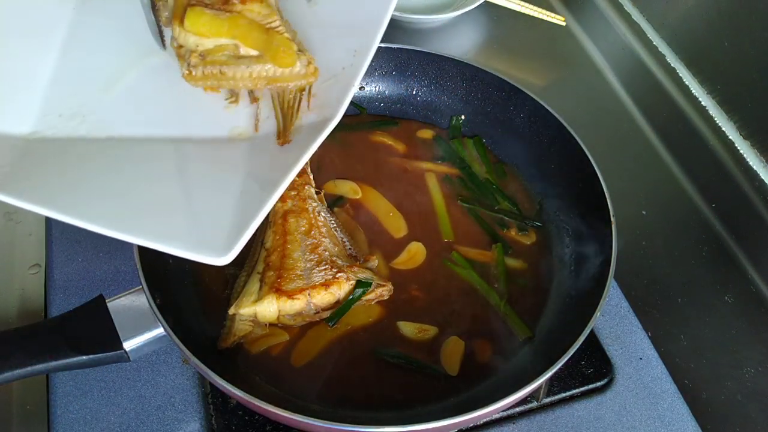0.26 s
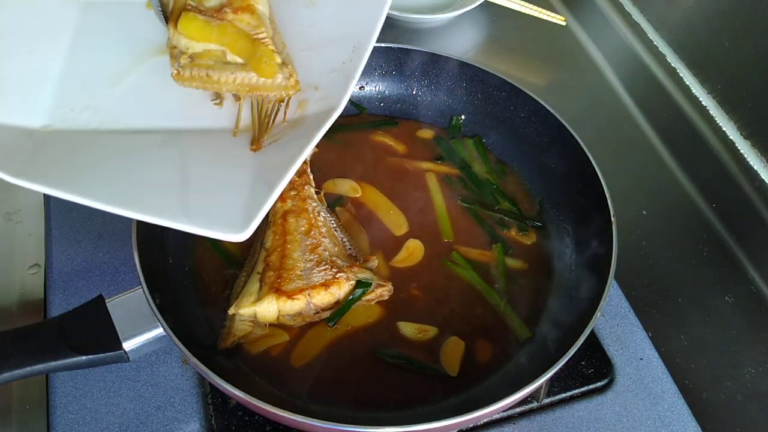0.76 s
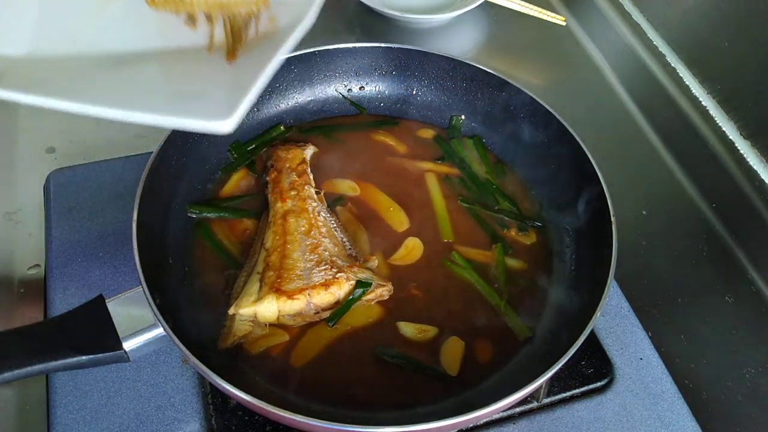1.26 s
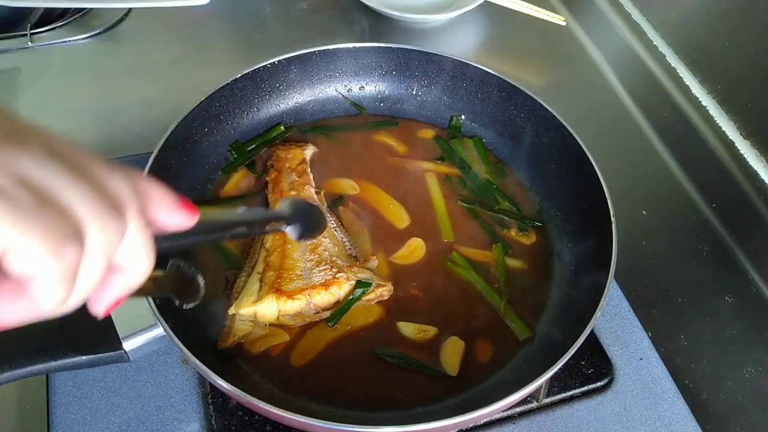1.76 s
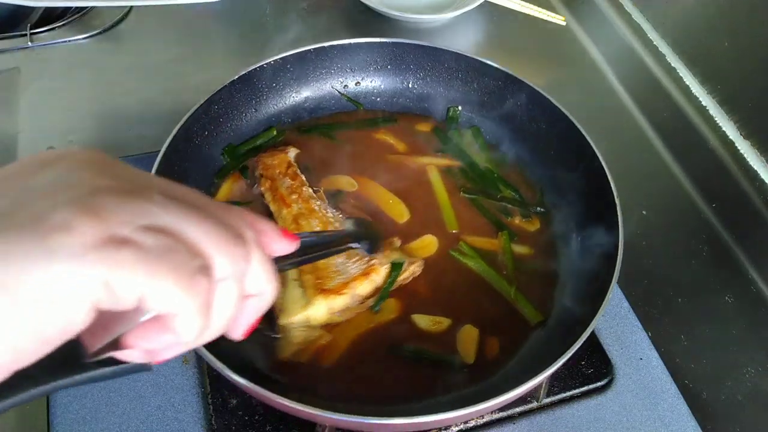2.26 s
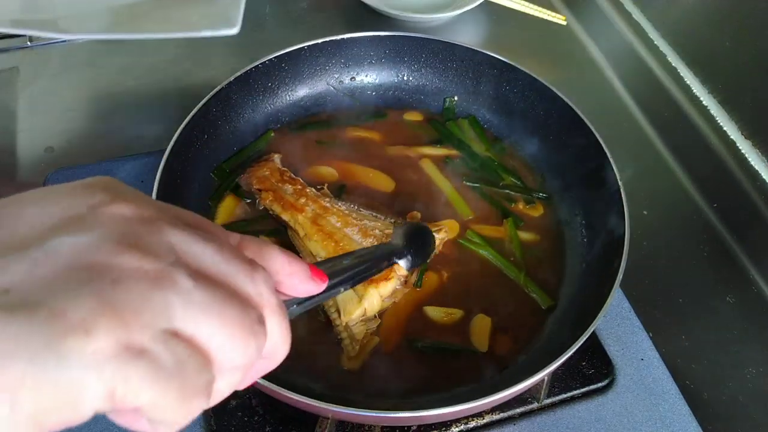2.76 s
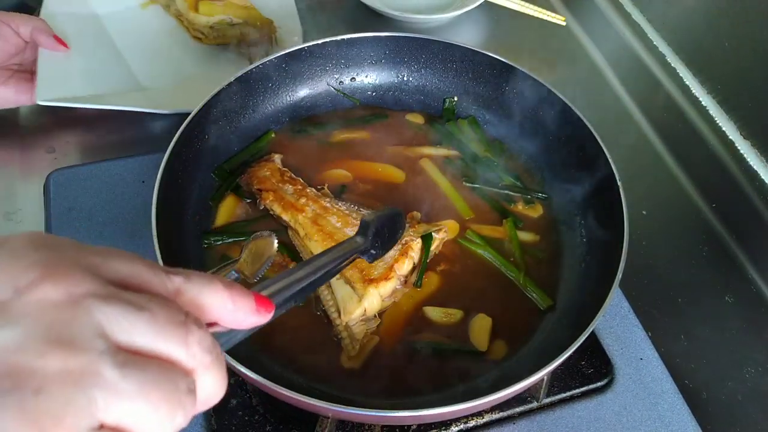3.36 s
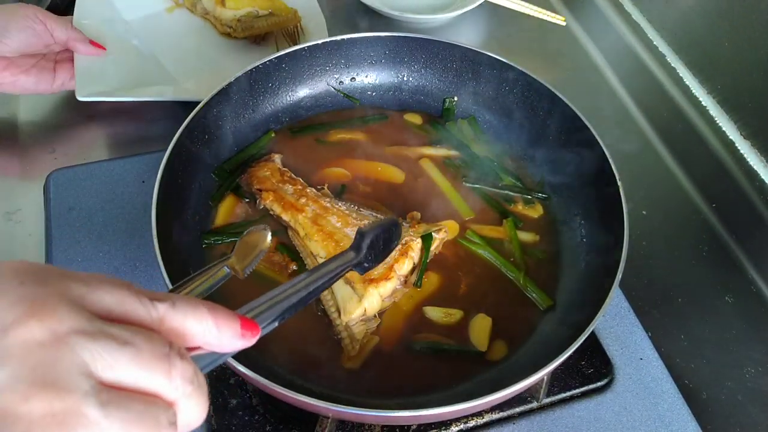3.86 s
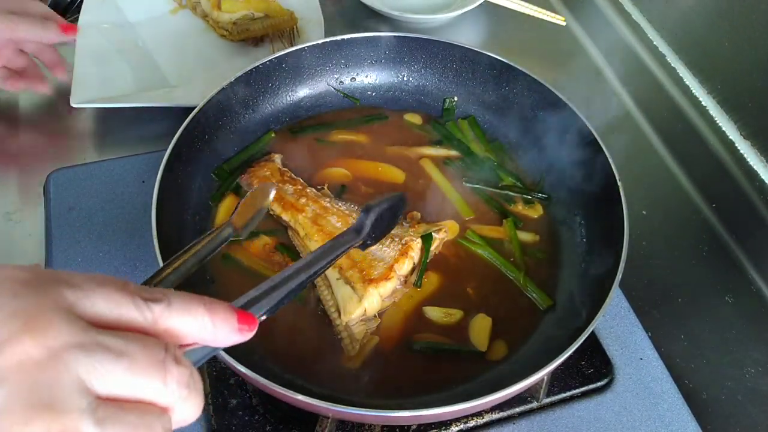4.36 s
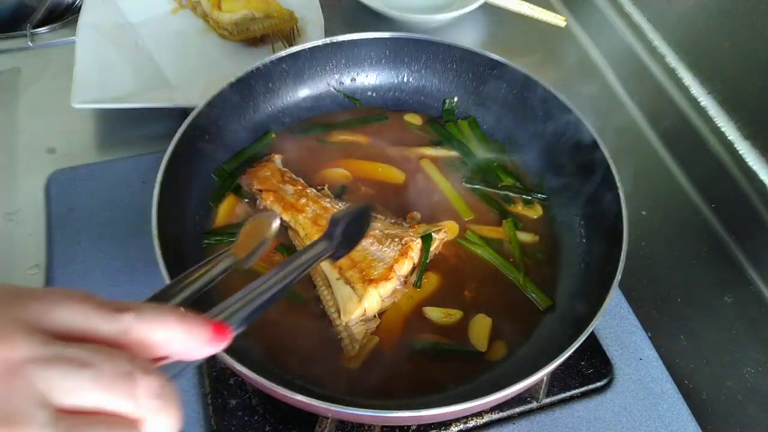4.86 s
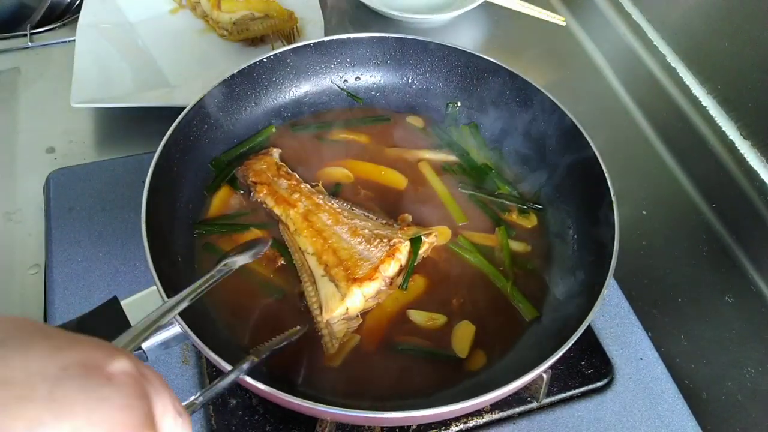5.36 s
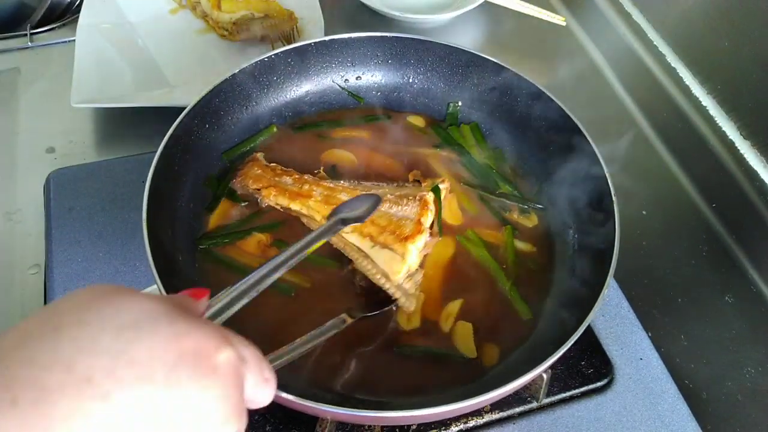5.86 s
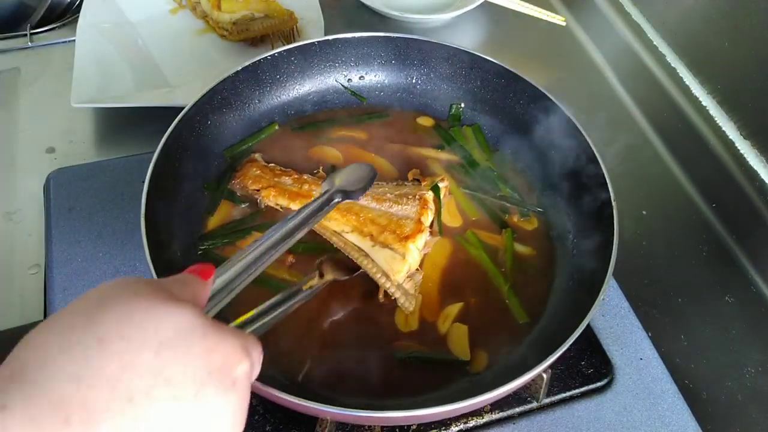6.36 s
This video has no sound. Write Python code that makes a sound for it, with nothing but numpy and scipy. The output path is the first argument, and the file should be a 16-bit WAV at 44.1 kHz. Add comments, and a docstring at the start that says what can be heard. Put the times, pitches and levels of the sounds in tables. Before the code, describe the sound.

Close to a stove, metal tongs give faint dry clicks, then a sharp clack on a pan, which settles with a soft falling tone. Scraping and a cluster of strong, dull metallic thuds come next, then a short lull, a run of quick light knocks, and final clicks and rubs. A deep motor hum continues throughout in a small reflective kitchen, picked up in close stereo.

```python
"""An extractor fan hums throughout in a small hard kitchen: a motor tone with overtones over rumble and rushing air.
From the start the steel tongs tick and tinkle, in short noise bursts around two pitches and ringing steel modes.
From 1.7 s they knock and clack on a coated frying pan: pan, stove grate and stove top ring under a steel crack.
Just after, the pan settles with a falling tone; then strokes of the tongs rub and scrape in slipping noise.
A pair of small microphones stands close by: bass nearly alike in both, treble unrelated."""
import sys
import numpy as np
from scipy import signal
from scipy.fft import rfft, irfft, next_fast_len
from scipy.io import wavfile
from scipy.ndimage import map_coordinates

SR = 44100
rng = np.random.default_rng(int(sys.argv[2]) if len(sys.argv) > 2 else 0)


def to_wav(s):
    """Save 16-bit WAV."""
    ch = np.atleast_2d(s).T  # columns
    pcm = np.round(np.clip(ch, -1, 1) * 32767)  # PCM
    wavfile.write(sys.argv[1], SR, pcm.astype(np.int16))


N = 291060

# Likeness of the two microphones: (frequency [Hz], likeness [-1 to 1])
LIKENESS = [(60, 0.99), (130, 1), (290, 0.68), (640, 0.29), (1400, -0.2), (3000, -0.025)]
# Modes of the steel tongs: (frequency [Hz], relative level [dB], 60 dB decay before damping [s])
TONGS_MODES = [(1820, -2, .05), (2330, -3, .06), (2770, -3, .05), (3350, -3, .05), (3830, -3, .06),
               (4080, -3, .08), (4600, -7, .04), (5260, -4, .07), (5570, -4, .09), (6280, -8, .05),
               (10300, -8, .04), (11200, 0, .06), (13300, -4, .05), (15000, -1, .06)]
# Spectrum of steel on metal: (frequency [Hz], relative level [dB per Hz])
STEEL_SPECTRUM = [(880, -13), (1500, -10.5), (1660, -6), (2080, -12), (2230, -12), (3690, -13.5),
                  (6000, -19), (7540, -20), (9370, -20), (11900, -13), (16000, -22)]


def amp(db):
    """Gain of a level in dB."""
    return 10 ** (np.asarray(db) / 20)


def unit(x):
    """x at rms 1."""
    return x / np.sqrt(np.mean(x ** 2) + 1e-20)


def along(points, hz):
    """(Hz, value) points read on a log frequency axis."""
    f, v = np.transpose(points)
    return np.interp(np.log(hz + 1), np.log(f + 1), v)


def wobble(rate):
    """A smooth random curve through rate knots a second."""
    knots = rng.standard_normal(int(N * rate / SR) + 4)
    return map_coordinates(knots, [np.arange(N) * rate / SR])


def filtered(x, response):
    """x times a response of frequency, padded so that the end does not wrap round."""
    m = next_fast_len(x.shape[-1] + 8192)
    return irfft(rfft(x, m) * response(np.fft.rfftfreq(m, 1 / SR)), m)[..., :x.shape[-1]]


def noise(n, spectrum):
    """Stereo noise of rms 1, alike in the bass and unrelated in the treble."""
    def mid_side_response(hz):
        turn = np.arccos(np.clip(along(LIKENESS, hz), -1, 1)) / 2
        return amp(along(spectrum, hz)) * [np.cos(turn), np.sin(turn)]

    mid, side = filtered(rng.standard_normal((2, n)), mid_side_response)
    return unit(np.array([mid + side, mid - side]))


def lumpy(spectrum, depth_db):
    """A spectrum broken up into many narrow peaks, as dense short modes of sheet metal give it."""
    hz = np.geomspace(100, 20000, num=150)
    return np.transpose([hz, along(spectrum, hz) + depth_db * rng.standard_normal(len(hz))])


def ring(modes, t, near_hz, focus_db, damping=1):
    """Decaying modes at new random strengths, focus_db weaker per octave away from near_hz."""
    hz, db, t60 = np.transpose(modes)[:, :, None]
    db = db - focus_db * np.abs(np.log2(hz / near_hz)) + rng.normal(0, 2, hz.shape)
    # the less alike the microphones are at a pitch, the more their phases may differ
    apart = np.arccos(np.clip(along(LIKENESS, hz), -1, 1)) * rng.uniform(-1, 1, hz.shape)
    fade = amp(db - db.max() - 60 * t / (t60 * damping))
    return np.array([(fade * np.sin(2 * np.pi * hz * t + side * apart / 2)).sum(0) for side in (1, -1)])


def swell(s, rise_s, fade_s):
    """Gain per sample: 1 at s, 20 dB down rise_s before and fade_s after."""
    t = np.arange(N) / SR - s
    return amp(-20 * np.maximum(-t / rise_s, t / fade_s) ** 1.22)


def add(out, s, x):
    """Mixes x into out from time s."""
    part = out[:, round(s * SR):][:, :x.shape[1]]
    part += x[:, :part.shape[1]]


def kitchen(x, wet_db):
    """x with the room's answer, a noise tail in which each frequency dies at its own speed."""
    # Reverberation of the room: (frequency [Hz], 60 dB decay [s])
    room_decay = [(100, 0.8), (500, 0.58), (2000, 0.76), (6000, 0.7), (14000, 0.37)]
    flat_noise = noise(SR * 3 // 5, [(1, 0)])
    hz, t, z = signal.stft(flat_noise, SR, nperseg=256)
    decay = amp(-60 * t / along(room_decay, hz)[:, None])
    tail = signal.istft(z * decay, SR, nperseg=256)[1]
    # the answer starts 200 samples (4.5 ms) after the direct sound
    tail = np.pad(tail / np.linalg.norm(tail[0]), ((0, 0), (200, 0)))
    wet = signal.fftconvolve(x.mean(0)[None], tail, axes=1)[:, :x.shape[1]]
    return x + amp(wet_db) * wet


def fan():
    """The motor's wavering tone, with overtones that come and go, over housing rumble and rushing air."""
    # Overtones of the hum: (multiple of the hum's pitch, mean peak level [dB])
    overtones = [(3, -64.5), (5, -68), (6, -76.5), (7, -73), (8, -69.5), (9, -75.5), (11, -77), (12, -75),
                 (13, -77), (14, -89), (15, -76), (20, -81.5), (45, -82)]
    # Wavering of the hum, a depth of 0 does nothing: (rate [Hz], depth [0-1])
    flutter = [(8.5, .03), (15, 0), (19.3, 0)]
    # The hum's octave swells and fades: (time [s], level [dB])
    octave_levels = [(0, -56.5), (.88, -58.5), (1.49, -70), (2.5, -57.5), (2.72, -47.5), (3.09, -61),
                     (3.75, -51.5), (4.7, -57), (5.42, -60), (5.62, -79), (5.99, -60), (6.6, -94)]
    # Rumble of the fan housing: (frequency [Hz], relative level [dB per Hz])
    rumble_spectrum = [(22, -37), (33, 2), (40, 1.5), (47, 2.5), (55, -18), (68, -10), (78, 4), (88, -31),
                       (110, -21), (140, -48)]
    # Rush of air: (frequency [Hz], relative level [dB per Hz])
    air_spectrum = [(56, -18), (95, -26), (118, -13.5), (239, -21.5), (284, -19.5), (330, -32), (465, -28),
                    (601, -27.5), (777, -30), (943, -34), (1190, -33), (3720, -47), (8050, -64.5),
                    (11800, -50), (16000, -64)]
    hum_hz, hum_db, rumble_db, air_db = 59.08, -31, -53.5, -57.5

    t = np.arange(N) / SR
    turn = 2 * np.pi * t
    waver = 1 + sum(depth * np.sin(turn * hz + 1.3 * wobble(1.6)) for hz, depth in flutter)
    tone = amp(hum_db + 0.13 * wobble(3.56)) * waver * np.sin(turn * hum_hz)
    tone += amp(np.interp(t, *np.transpose(octave_levels))) * np.sin(2 * turn * hum_hz)
    for k, db in overtones:
        tone += amp(db + 1.72 * wobble(1.95)) * np.sin(turn * hum_hz * k + k * k)
    rumble = amp(rumble_db) * noise(N, rumble_spectrum)
    air = amp(air_db + 0.4 * wobble(5.9)) * noise(N, air_spectrum)
    return tone + rumble + air


def ticks():
    """A tick is a few milliseconds of noise around two pitches; a tinkle rings the steel modes."""
    # Dry ticks of the tongs: (time [s], low level [dB], high level [dB], low pitch [Hz])
    tick_events = [(.0225, -53, -78, 4400), (0.066, -73, -54, 3160), (0.0735, -54, -78, 6600),
                   (.735, -59.5, -58, 4510), (0.7864, -58, -46.5, 3120), (0.794, -54.5, -63, 4420),
                   (1.1773, -63, -80, 3530), (1.614, -59, -60, 5960), (1.9684, -64, -56, 3360),
                   (2.1335, -69, -52, 3010), (2.466, -63, -80, 3380), (2.811, -60, -80, 3030),
                   (3.2529, -38, -65, 5230), (4.705, -66, -44, 3100), (5.3664, -74, -53, 3050),
                   (5.413, -58.5, -60, 3940), (6.1743, -41.5, -46, 2870), (6.1977, -45, -46, 3360),
                   (6.246, -56, -49, 3880), (6.3136, -58, -68, 3770), (6.395, -66, -57, 3090),
                   (6.576, -55, -56, 5000)]
    # Loose arms touching again and again:
    # (time [s], length [s], low level [dB], high level [dB], low pitch before scatter [Hz])
    tinkle_events = [(0.112, .215, -68, -60, 3420), (0.829, .01, -65, -66, 4080),
                     (0.968, .01, -70, -74, 4080)]
    high_tick_hz, high_scatter = 11000, 0.052  # scatter in natural log of pitch
    faint_db, faint_hz = -74, 3300
    tinkle_gap_s = 0.023

    out, t = np.zeros((2, N)), np.arange(SR // 8) / SR
    rise = 1 - np.exp(-t / 0.00048)
    # faint ticks fall by chance, about one a second
    faint = [(s, faint_db, faint_db, faint_hz) for s in rng.uniform(0, N / SR, size=N // SR)]
    for s, low_db, high_db, low_hz in tick_events + faint:
        high_hz = high_tick_hz * np.exp(high_scatter * rng.standard_normal())
        for db, hz in ((low_db, low_hz), (high_db, high_hz)):
            band = [(hz / 2, -30), (hz, 0), (hz * 2.57, -16), (hz * 4, -60)]
            add(out, s, amp(db - 60 * t / 0.022) * rise * noise(len(t), band))

    for start, length, low_db, high_db, near_hz in tinkle_events:
        for s in np.arange(start, start + length, tinkle_gap_s):
            late, spread, high_hz = rng.uniform([0, -.4, 10500], [.008, .4, 15500])
            rough = 1 + noise(len(t), [(200, 0), (900, -30)])  # the arms still rub while they ring
            low_hz = near_hz * np.exp(spread * length / .2)  # longer tinkles scatter more in pitch
            low = amp(low_db) * ring(TONGS_MODES, t, low_hz, focus_db=22, damping=.7)
            high = amp(high_db) * ring(TONGS_MODES, t, high_hz, focus_db=24, damping=.55)
            add(out, s + late, amp(rng.normal(0, 1.7)) * rise * rough * (low + high))
    return out


def contacts():
    """Each contact rings pan, grate and stove top and gives a short steel crack."""
    # Tongs meeting the pan: (time [s], pan level [dB], thud level [dB], steel level [dB], pan pitch [Hz],
    # grate pitch [Hz], steel pitch [Hz], left over right in pan and steel [dB], damping time [s],
    # narrowness around the pan pitch [roughly dB per octave])
    contact_events = [ (1.708, -40.5, -45, -25, 1240, 318, 3200, 0.5, 0.086, 13.5),
                      (1.78, -54, -42.5, -60, 600, 285, 2960, -4, 0.16, 29),
                      (2.126, -42.5, -33.5, -52, 596, 250, 2730, 1, 0.035, 7),
                      (2.209, -54, -39, -62, 600, 297, 3600, 1, 0.073, 5),
                      (2.314, -43.5, -44.5, -74, 546, 360, 2650, 5, 0.034, 9.5),
                      (2.995, -25, -46, -24, 930, 346, 4440, -1, 0.13, 7),
                      (3.040, -38, -39.5, -48, 805, 177, 2500, -4, 0.063, 25),
                      (3.270, -40.5, -20.5, -43, 610, 217, 5800, -3, 0.085, 4.5),
                      (3.341, -48.5, -26.5, -54, 574.5, 226, 3000, 0, 0.12, 23),
                      (3.375, -57, -25, -44, 500, 174, 3530, -3, 0.022, 20),
                      (3.681, -23, -18, -37.5, 733, 249, 5520, 0, 0.067, 6),
                      (3.71, -23, -23, -61, 450, 172, 3970, 1, 0.029, 9),
                      (3.954, -23.5, -17.5, -35.5, 610, 317, 2600, 3.5, 0.049, 7),
                      (4.710, -33.5, -29, -52, 1260, 295, 2300, 0, 0.04, 14.5),
                      (4.735, -37.5, -60, -72, 1100, 290, 2500, 0, 0.046, 13),
                      (4.760, -41, -32.5, -70, 470, 265, 2590, -2, 0.041, 10),
                      (4.807, -36.5, -34, -61, 1240, 298, 2300, -2.5, 0.052, 12),
                      (4.85, -44, -39, -66, 460, 289, 2530, -3, 0.031, 10),
                      (4.971, -45.5, -39.5, -67, 594, 256, 2540, 1, 0.057, 3.5),
                      (5.131, -34.5, -33, -73, 1140, 285, 2650, -4, 0.037, 20),
                      (5.152, -39, -47.5, -34, 520, 268, 1830, -1, .098, 7),
                      (5.190, -49, -54, -73, 730, 280, 2650, 4, 0.1, 56),
                      (5.399, -50, -37.5, -68, 587, 250, 2590, 1, 0.03, 19),
                      (5.714, -41, -43.5, -40.5, 624, 307, 1800, -5, 0.045, 13),
                      (5.917, -52.5, -41, -77, 1030, 288, 2650, -3, .039, 14),
                      (6.081, -40, -41.5, -26, 620, 297, 2970, 4, 0.032, 4),
                      (6.111, -45, -37.5, -47, 1820, 280, 2690, 8, 0.027, 31)]
    # Modes of pan, grate and stove top:
    # (frequency [Hz], relative level [dB], 60 dB decay before each contact's damping [s])
    pan_modes = [(455, -3, .09), (545, -3, .09), (590, -3, .08), (655, -3, .09), (750, -3, .09),
                 (802, 0, .11), (940, -3, .08), (1010, 0, .1), (1215, -2, .1), (1500, -1, .08),
                 (1800, -4, .06), (2220, -8, .07), (2510, -12, .06)]
    grate_modes = [(173.8, 4, 0.34), (217.9, 4.5, 0.15), (246, -1.5, 0.15), (281.4, -1, 0.2),
                   (367.5, -5, 0.22)]
    stove_modes = [(84.3, -3.5, 0.22), (101.4, -5, 0.67), (117, -15, 0.76)]
    even_db, dull_per_db = -16, 0.32  # thud over steel that leaves the treble as it is; dB lost per dB above
    stove_db, stove_per_octave_db = -7, -6  # stove under grate at 250 Hz; deeper thuds shake it more

    out, t = np.zeros((2, N)), np.arange(SR * 3 // 5) / SR
    rise = 1 - np.exp(-t / 0.001)
    low_rise = 1 - np.exp(-t / 0.0044)
    for (s, pan_db, thud_db, steel_db, pan_hz, grate_hz, steel_hz,
         side_db, damp, narrow_db) in contact_events:
        # the pan chatters around the pitch of the spot that is hit while its modes ring and die away
        spot = [(pan_hz / 4, -2.5 * narrow_db), (pan_hz, 0), (pan_hz * 2, -1.1 * narrow_db),
                (pan_hz * 4, -3.2 * narrow_db), (pan_hz * 16, -90)]
        chatter = amp(-60 * t / damp) * noise(len(t), spot)
        pan = amp(pan_db) * (chatter + ring(pan_modes, t, pan_hz, narrow_db + 6.0, damp / 0.11))

        grate = ring(grate_modes, t, grate_hz, focus_db=28, damping=damp / 0.11)
        stove_gain = amp(stove_db + stove_per_octave_db * np.log2(grate_hz / 250))
        stove = stove_gain * ring(stove_modes, t, near_hz=100.3, focus_db=6.0, damping=damp / 0.096)
        low = amp(thud_db) * (grate + stove) * low_rise * amp([[.8], [-.8]])

        # a heavier, blunter blow has less steel treble, a lighter one more
        treble_db = -dull_per_db * (thud_db - steel_db - even_db)
        colour = [(hz, db + treble_db * (hz > 6500)) for hz, db in STEEL_SPECTRUM]
        blow = amp(-60 * t / (.5 * damp))
        rattle = 0.34 * amp(-60 * t / (1.67 * damp))
        hiss = noise(len(t), lumpy(colour, depth_db=2.5))
        sing = ring(TONGS_MODES, t, steel_hz, focus_db=30)
        crack = (blow + rattle) * hiss + 0.24 * sing

        struck = (pan + amp(steel_db) * crack) * rise * amp([[side_db / 2], [-side_db / 2]])
        # part of the thud reaches the microphones through the counter, without the room
        add(out, s, .5 * low + kitchen(struck + .5 * low, wet_db=-3.5))
    return out


def groan():
    """The pan settles with one soft tone that glides down, alike in both microphones."""
    # Ends of the glide: times [s], then pitches [Hz]
    glide_s = (1.78, 1.84)
    glide_hz = (270.5, 223)
    # Shape of the tone: (swell [s], fade [s], level [dB])
    groan_shape = (0.12, 0.079, -41)
    loudest_s = 1.85
    turns = np.cumsum(np.interp(np.arange(N) / SR, glide_s, glide_hz)) / SR
    rise_s, fade_s, db = groan_shape
    return amp(db) * swell(loudest_s, rise_s, fade_s) * np.sin(2 * np.pi * turns)


def strokes():
    """Wet rubbing: noise in uneven small slips that swell and fade with each stroke."""
    # Strokes of the tongs over pan and fish: (loudest time [s], swell [s], fade [s],
    # body level [dB], rasp level [dB], hiss level [dB])
    stroke_events = [(2.169, 0.28, 0.2, -53, -55.5, -69), (2.314, 0.011, .04, -55, -57, -66),
                     (3.039, 0.036, .13, -59, -42, -40.5), (3.26, 0.18, 0.066, -54, -58, -43),
                     (3.362, 0.069, 0.24, -58, -55.5, -54.5), (4.62, 0.22, 0.33, -72, -79, -66),
                     (5.2, 0.019, 0.12, -71, -78, -73), (5.388, 0.021, 0.071, -68, -62, -60.5),
                     (5.468, 0.018, .035, -57, -62, -65.5), (6.12, 0.011, 0.12, -75, -61, -63.5),
                     (6.322, 0.043, 0.064, -60, -64, -67), (6.4, 0.023, .02, -63, -76, -59.5)]
    # Spectra of a stroke's body and of the edge of the tongs: (frequency [Hz], relative level [dB per Hz])
    body_spectrum = [(150, -15), (250, -2), (319, -11), (501, -10), (1000, -11), (1300, -20), (2200, -120)]
    rasp_spectrum = [(700, -40), (1080, -14), (1230, 0), (1370, -8), (1550, -5), (1900, -15), (2500, -14),
                     (3300, -24), (3600, -13), (3900, -30), (7000, -120)]

    slips = amp(2.1 * wobble(34) + 0.22 * wobble(240))
    gains = np.zeros((3, N))
    for s, rise_s, fade_s, *levels_db in stroke_events:
        gains += amp(levels_db)[:, None] * swell(s, rise_s, fade_s)
    out = np.zeros((2, N))
    for gain, spectrum in zip(gains, (body_spectrum, rasp_spectrum, STEEL_SPECTRUM)):
        out += gain * unit(slips * noise(N, spectrum))
    return out


def scene():
    """Everything as it reaches the microphones."""
    return fan() + kitchen(ticks(), wet_db=-0.5) + contacts() + groan() + strokes()


def record(dry):
    """The microphone ports colour the sound, and nothing is kept from the band limit up."""
    # Colour of the microphone ports: (frequency [Hz], gain [dB])
    port_colour = [(24, -69), (38, 0.5), (6000, 3), (7900, -4.5), (9800, 2.5), (14000, 2.5), (15800, -2)]
    top_hz = 15750
    return filtered(dry, lambda hz: amp(along(port_colour, hz)) * (hz < top_hz))


dry = scene()
out = record(dry)
to_wav(out)
```